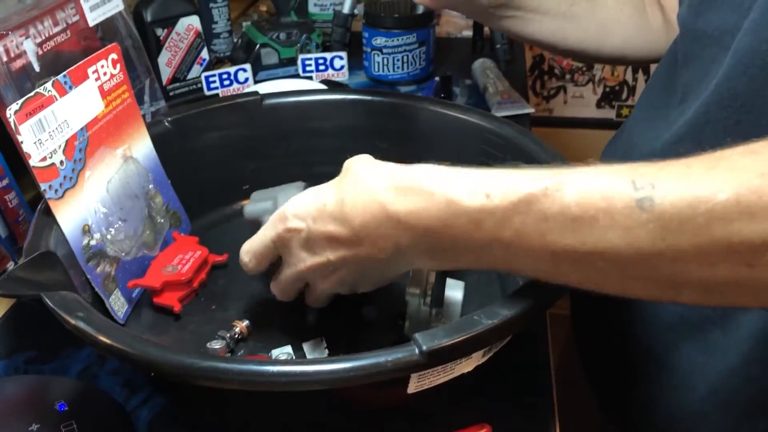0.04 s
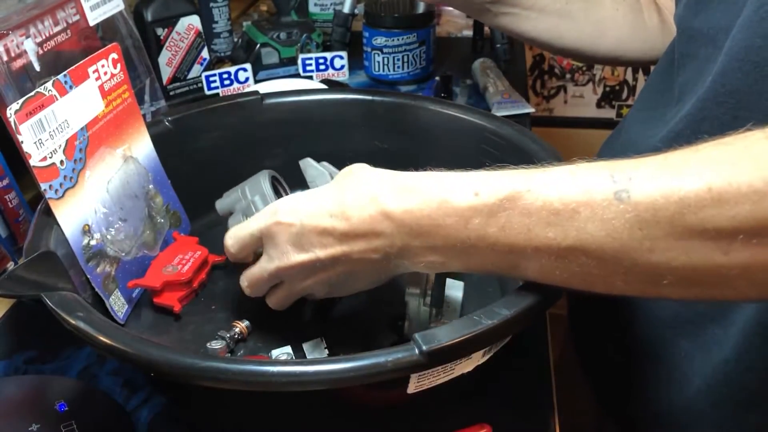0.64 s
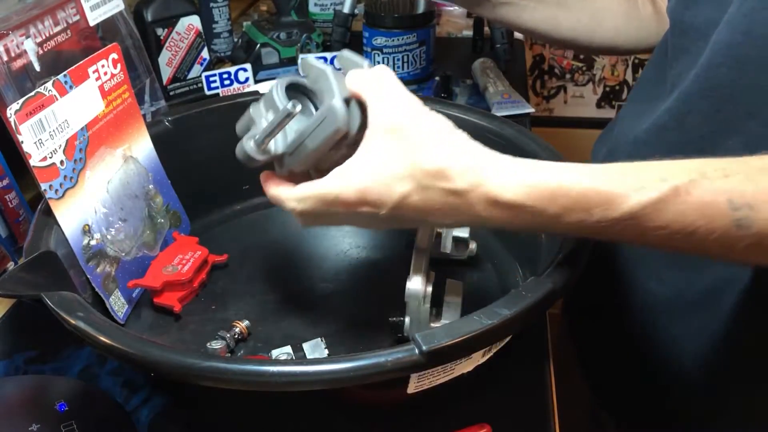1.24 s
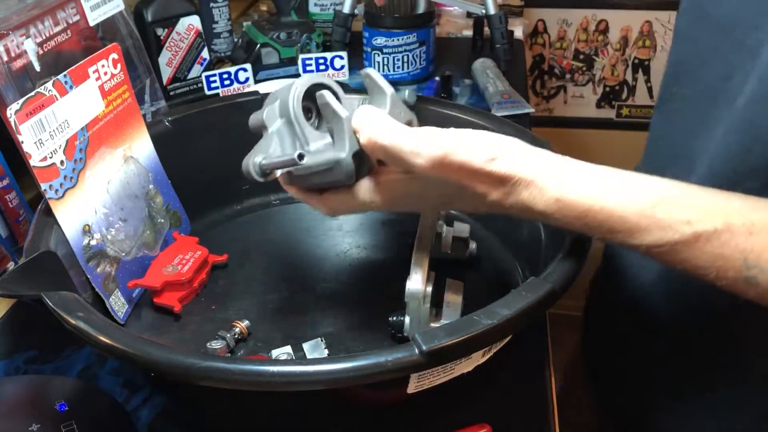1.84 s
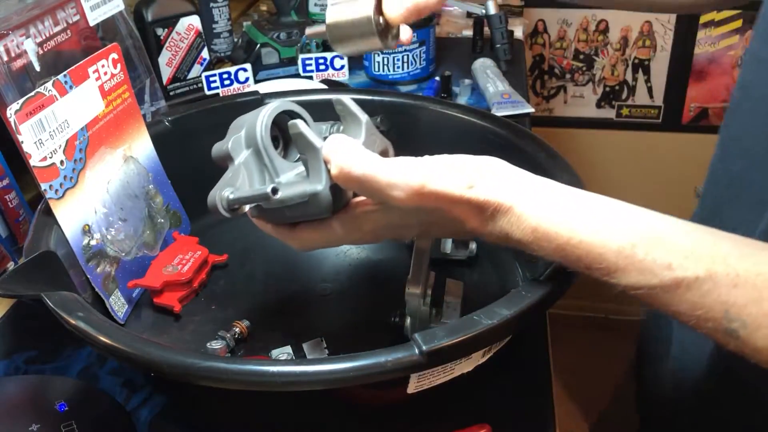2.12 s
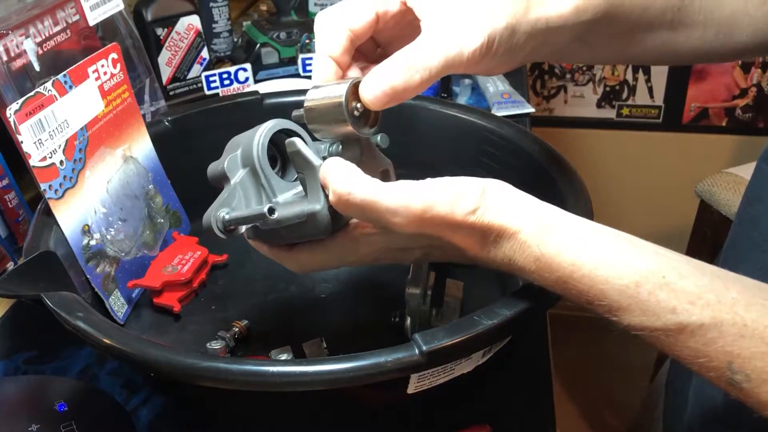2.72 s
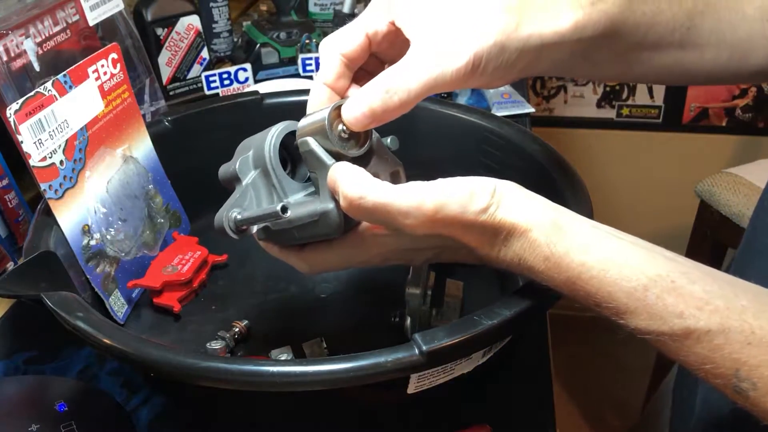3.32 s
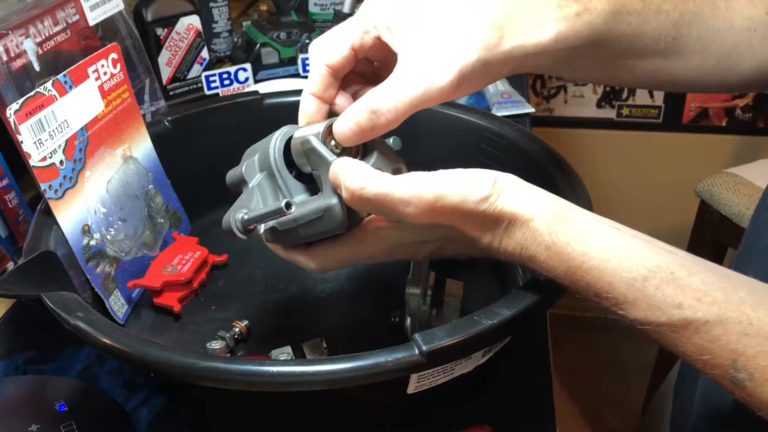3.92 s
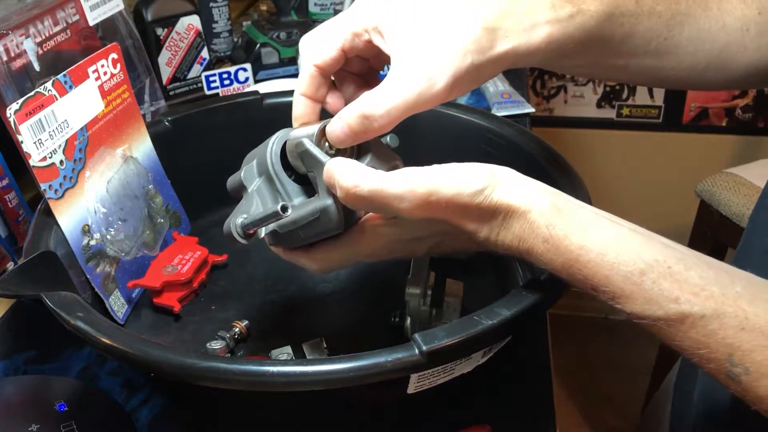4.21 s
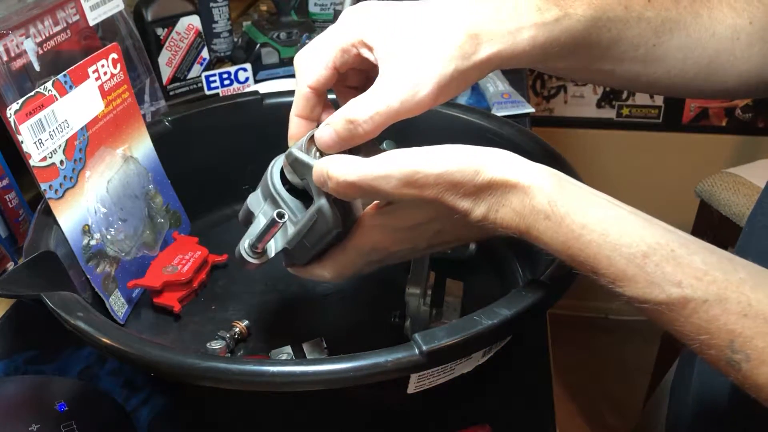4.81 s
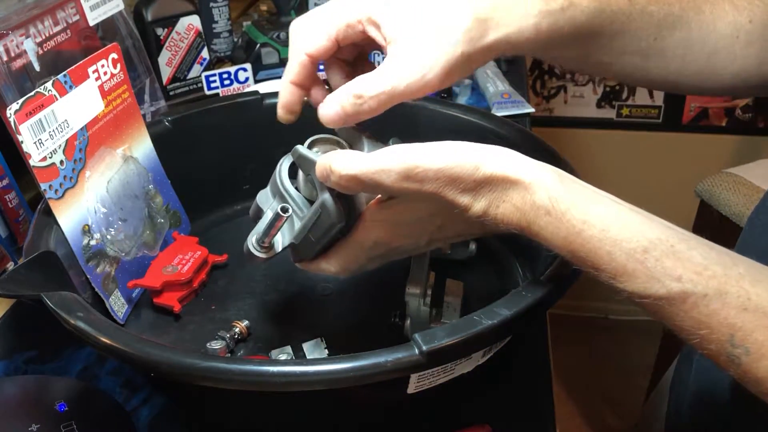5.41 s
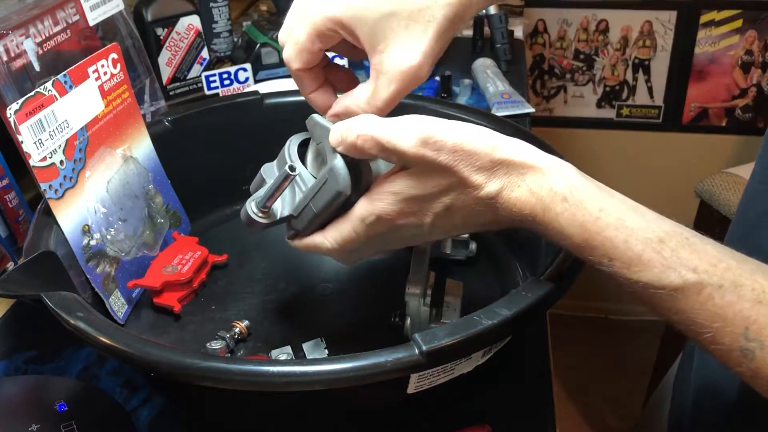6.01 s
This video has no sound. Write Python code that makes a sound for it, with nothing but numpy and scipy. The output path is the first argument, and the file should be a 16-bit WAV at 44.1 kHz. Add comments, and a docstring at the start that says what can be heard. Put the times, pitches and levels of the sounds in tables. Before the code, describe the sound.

A metal brake caliper clicks, knocks and scuffs softly as it is lifted from a plastic tub, and fingers brush the casting. About halfway through, a steel piston taps and clinks against it and briefly scrapes in. Near the end the piston drops home with one bright, rattling, ringing clack, followed by a few light taps. The sounds are close, in a small workshop with a faint electrical hum and fan.

```python
"""Mains hum and a fan fill a small workshop throughout. A brake caliper clicks, knocks and scuffs as it is
lifted out of a plastic tub; fingers brush the casting and light contacts ring on it. From about 2.8 s its
steel piston taps the rim of the bore and scrapes in, exciting the modes of the metal. At 5.2 s the piston
drops home with one bright, rattling clack that sets the whole caliper ringing; a few light taps follow."""
import sys
import numpy as np
from scipy import signal
from scipy.fft import rfft, irfft, next_fast_len
from scipy.io import wavfile
from scipy.ndimage import map_coordinates

SR = 44100
rng = np.random.default_rng(int(sys.argv[2]) if len(sys.argv) > 2 else 0)


def output_pcm(signal):
    """Save a mono or channel-first signal as 16-bit PCM at the path in sys.argv[1].

    Samples are clipped to [-1, 1] before scaling.
    """
    pcm = np.clip(np.atleast_2d(signal).T, -1, 1) * 32767
    wavfile.write(sys.argv[1], SR, np.round(pcm).astype(np.int16))


N = 271215
TIME = np.arange(N) / SR
AGE = np.arange(SR // 2) / SR  # seconds since a blow

# spectrum of a dull blow on the caliper: frequency_hz, density_db
KNOCK_SPECTRUM = [(80, -37), (400, -14), (900, 0.5), (1600, -1.5), (2500, -12), (4000, -15.5), (7000, -22),
                  (15000, -38)]
# spectrum of the bright tick of steel on steel: frequency_hz, density_db
TICK_SPECTRUM = [(500, -26), (2500, -21), (6000, -26), (9000, -2.5), (12000, 20.5), (14500, -0.5),
                 (16000, 3.5)]


def amp(db):
    """Amplitude ratio of a level in decibels."""
    return 10 ** (np.asarray(db) / 20)


def unit(x):
    """Normalisation to an rms of 1."""
    return x / np.sqrt(np.mean(x ** 2) + 1e-20)


def along(points, hz):
    """Interpolation of (frequency_hz, value) points on a logarithmic frequency axis."""
    frequencies, values = np.transpose(points)
    return np.interp(np.log(hz + 1), np.log(frequencies + 1), values)


def fade(t60_s):
    """Damping: a free vibration decays exponentially, by 60 dB in t60_s."""
    return np.exp(-np.log(1000) * AGE / t60_s)


def add(track, start_s, sound):
    """Superposition: a sound adds to the track from start_s on."""
    part = track[max(round(start_s * SR), 0):][:len(sound)]
    part += sound[:len(part)]


def filtered(x, response):
    """Linear filtering: the spectrum is multiplied by a frequency response."""
    size = next_fast_len(len(x) + 8192)
    return irfft(rfft(x, size) * response(np.fft.rfftfreq(size, 1 / SR)), size)[:len(x)]


def noise(spectrum, size):
    """Spectral shaping: white noise is coloured, then scaled to an rms of 1."""
    return unit(filtered(rng.standard_normal(size), lambda hz: amp(along(spectrum, hz))))


def wobble(knots_per_s):
    """Random modulation: a smooth curve through Gaussian values."""
    knots = rng.standard_normal(int(N * knots_per_s / SR) + 4)
    return map_coordinates(knots, [TIME * knots_per_s])


def burst(spectrum, t60_s):
    """Modal overlap: many close modes struck at once merge into decaying noise."""
    return noise(spectrum, len(AGE)) * fade(t60_s)


def mode(hz, t60_s):
    """A normal mode vibrates as a damped sinusoid, here of random phase."""
    return np.sin(2 * np.pi * (hz * AGE + rng.random())) * fade(t60_s)


def resonate(force, modes):
    """Forced vibration: second-order resonances of alternating sign, summed and scaled to an rms of 1."""
    def response(f):
        return sum((-1) ** k * amp(db) * 1j * f * width_hz / (hz * hz - f * f + 1j * f * width_hz)
                   for k, (hz, width_hz, db) in enumerate(modes))
    return unit(filtered(force, response))


def swells(events):
    """Gaussian envelopes: each event rises and falls in a bell curve."""
    return sum(amp(db) * np.exp(-.5 * ((TIME - middle_s) / half_width_s) ** 2)
               for middle_s, db, half_width_s in events)


def hum(waver_db=-0.36, drift_rad=0.089):
    """Periodic vibration of mains and fan gives a line spectrum, slightly unsteady in level and phase."""
    # hum lines: pitch_hz, rms_db
    lines = [(92.8, -60.5), (120, -53), (186, -66), (240, -68), (360, -68.5), (480, -74.5)]
    out = np.zeros(N)
    for hz, db in lines:
        peak = np.sqrt(2) * amp(db + waver_db * wobble(3))
        out += peak * np.sin(2 * np.pi * (hz * TIME + rng.random()) + drift_rad * wobble(1.3))
    return out


def fan(rms_db=-53):
    """Resonance lifts narrow bands of the fan's broadband rush and makes it hollow."""
    # rush of air: frequency_hz, density_db
    air_spectrum = [(20, -43), (38, -21.5), (58, -1), (80, -2), (130, -1.5), (210, -6), (370, -6),
                    (440, -10.5), (650, -9.5), (850, -13.5), (1150, -17), (1650, -17.5), (1950, -22),
                    (2600, -26.5), (3400, -30.5), (4400, -30.5), (7000, -34.5), (15500, -39)]
    # duct resonances: centre_hz, width_hz, boost_db
    duct_modes = [(147.6, 9.7, 8), (181, 9.1, 6.5), (261, 16, 5.5), (1310, 58, 6.5), (1529, 83, 4)]

    def duct_gain(f):
        return amp(sum(db / (1 + (2 * (f - hz) / width_hz) ** 2) for hz, width_hz, db in duct_modes))
    return amp(rms_db) * unit(filtered(noise(air_spectrum, N), duct_gain))


def reverberation(x, delay_s=.006):
    """Wall reflections form a diffuse tail, in which absorption takes the treble first."""
    # reverberation times of the workshop: frequency_hz, t60_s
    decay_times = [(200, 0.4), (2000, 0.33), (5000, 0.33), (9000, 0.26), (15000, 0.16)]
    hz, t, spectra = signal.stft(rng.standard_normal(SR // 2), SR, nperseg=256)
    decay = np.exp(-np.log(1000) * t / along(decay_times, hz)[:, None])
    tail = signal.istft(spectra * decay, SR, nperseg=256)[1]
    tail = np.pad(tail / np.linalg.norm(tail), (round(delay_s * SR), 0))
    return signal.fftconvolve(x, tail)[:N]


def fingers(grain_db=3, nail_t60_s=0.032):
    """Contact noise: two short, broad clicks as the caliper is picked up, finger brushes, nail ticks."""
    # finger brushes and the two clicks: middle_s, level_db, half_width_s
    touches = [(.03, -60, 0.025), (.038, -59, .003), (.058, -50.5, .002), (.73, -70, .05),
               (1.11, -66.5, 0.045), (1.375, -64, 0.057), (1.51, -59.5, 0.023), (1.914, -72, .034),
               (2.15, -70.5, 0.34)]
    # spectrum of the brushes and clicks: frequency_hz, density_db
    touch_spectrum = [(500, 0), (2000, -6), (4500, -3), (8000, -7), (13000, -12), (16000, -6)]
    # fingernail impacts: start_s, level_db
    nail_ticks = [(1.38, -51.5), (2.4412, -55)]
    # nail striking metal: frequency_hz, density_db
    nail_spectrum = [(2000, -18), (6000, -9), (9000, -1), (13000, 2), (16000, -10)]
    out = swells(touches) * unit(noise(touch_spectrum, N) * amp(grain_db * wobble(500)))
    for start_s, db in nail_ticks:
        add(out, start_s, amp(db) * burst(nail_spectrum, nail_t60_s))
    return out


def scuffs(grain_db=3):
    """Sliding friction: the caliper drags on the tub, and the piston in the bore, with a dull noise."""
    # dragging strokes: middle_s, level_db, half_width_s
    strokes = [(.112, -55, 0.05), (1.003, -56, 0.025), (3.55, -62, 0.023)]
    return swells(strokes) * unit(noise(KNOCK_SPECTRUM, N) * amp(grain_db * wobble(200)))


def jaws():
    """Free vibration: the caliper's open jaws ring like a tuning fork."""
    # modes of the jaws: pitch_hz, level_db, t60_s
    modes = [(2251, -0.5, 0.6), (2560, -10.5, 0.29)]
    return sum(amp(db) * mode(hz, t60_s) for hz, db, t60_s in modes)


def knocks(push_hz=1100, push_t60_s=0.0056, thud_t60_s=.06):
    """Impacts damped by the hand: a push of a few cycles, a thud and a faint ring of the jaws."""
    # the caliper against tub and piston: start_s, thud_db, push_db, jaws_db
    blows = [(.036, -44, -50, -85), (.0564, -44, -45, -85), (.119, -46.5, -52, -85), (.979, -53, -38, -90),
             (1.017, -50, -47, -90), (2.7793, -50, -33, -56), (2.9992, -49.5, -48, -54),
             (3.114, -53.5, -48, -80), (5.2453, -31.5, -38, -79)]
    out = np.zeros(N)
    push = np.sin(2 * np.pi * push_hz * AGE) * fade(push_t60_s)
    for start_s, thud_db, push_db, jaws_db in blows:
        thud = burst(KNOCK_SPECTRUM, thud_t60_s)
        add(out, start_s, amp(push_db) * push + amp(thud_db) * thud + amp(jaws_db) * jaws())
    return out


def metal_taps(scatter_db=1.5, tick_db=-12, tick_t60_s=.025, jaws_db=-33, attack_s=.0005):
    """Contact damping: light taps let the steel ring, firm ones shorten the ring. Some taps rebound."""
    # modes of the metal rung by light contacts and taps: pitch_hz, level_db, t60_s
    steel_modes = [(3058, -12.5, 0.36), (5610, -9.5, 0.16), (6810, -32, 0.24), (7100, -16, 0.16),
                   (8320, -23, .22), (9525, -19, .15), (10650, -15, .08), (11680, -7, 0.27),
                   (12100, -4, 0.086), (12150, -24, 0.054), (12600, -17, .06), (13520, -18, .06),
                   (14130, -16, 0.14), (14350, -5, .04)]
    # light ringing contacts on the caliper, then the piston tapping the bore:
    # start_s, level_db, tilt_db_per_octave, contact_count
    taps = [(0.09, -60, 5, 1), (.515, -68, 2, 1), (1.9, -66, 0, 1), (2.778, -57, 12, 1),
            (2.826, -57.5, 8, 1), (3.0014, -53, -6, 1), (3.113, -40.5, 3, 4), (3.178, -60, 5, 1),
            (3.196, -60, 7, 2), (3.257, -69, 9, 1), (3.268, -49.5, 7, 2), (3.435, -53, 6, 1),
            (3.517, -49, 12, 1), (3.614, -52, 3, 1), (3.798, -65, -4.5, 1), (4.784, -66, -1, 1),
            (4.9387, -57.5, 0.5, 2), (5.188, -52, 1, 3), (5.675, -57.5, 4, 1), (5.81, -64, 4, 1),
            (5.855, -70, 2, 1)]
    bounce_s, bounce_loss_db = 0.01, 5
    free_ring_db, halving_db = -62.5, 14  # ring time halves for each halving_db above free_ring_db
    onset = 1 - np.exp(-AGE / attack_s)
    out = np.zeros(N)
    for start_s, first_db, tilt, contact_count in taps:
        damping = 2 ** ((first_db - free_ring_db) / halving_db)
        for k in range(round(contact_count)):
            ring = np.zeros(len(AGE))
            for hz, db, t60_s in steel_modes:
                mode_db = db + tilt * np.log2(hz / 10000) + scatter_db * rng.standard_normal()
                ring += amp(mode_db) * mode(hz, t60_s / damping)
            contact = ring + amp(jaws_db) * jaws() + amp(tick_db) * burst(TICK_SPECTRUM, tick_t60_s)
            add(out, start_s + k * bounce_s, amp(first_db - k * bounce_loss_db) * contact * onset)
    return out


def steel_scrape(slips_per_s=6000, chatter_db=3, ring_db=-4, rasp_db=-2):
    """Stick-slip friction: dense tiny slips of steel on steel drive the resonances of the metal."""
    # sliding strokes: middle_s, level_db, half_width_s
    strokes = [(0.125, -59.5, 0.025), (.515, -71, 0.021), (3.535, -49, .043), (3.768, -67.5, .028),
               (5.21, -60, .016)]
    # resonances ringing freely: centre_hz, width_hz, level_db
    free_modes = [(2270, 14, -3), (2574, 12, -7), (3060, 17, -3.5), (5610, 51, -1.5), (6716, 15.85, 2),
                  (7230, 20, -1.5), (8360, 16, 1.5)]
    # resonances pinched at the contact: centre_hz, width_hz, level_db
    pinched_modes = [(10660, 350, -11.5), (11660, 140, -0.5), (12150, 370, -5), (12580, 600, -15.5),
                     (14130, 195.5, -6)]
    speed = swells(strokes)
    slipping = rng.random(N) < slips_per_s / SR
    slips = unit(slipping * rng.standard_normal(N) * amp(chatter_db * wobble(120)))
    force = speed * slips
    ring = np.std(force) * resonate(force, free_modes)
    # a firm stroke starts cocked; the pinched resonances sink as the piston straightens
    pitch_rise, lead_half_widths = .05, 2.3
    firmest_db = max(db for _, db, _ in strokes)
    cocked = swells([(middle_s - lead_half_widths * half_width_s, db - firmest_db, half_width_s)
                     for middle_s, db, half_width_s in strokes])
    read_position = np.cumsum(1 + pitch_rise * cocked)
    rasp = map_coordinates(resonate(slips, pinched_modes), [read_position], order=5)
    return amp(ring_db) * ring + amp(rasp_db) * speed * rasp


def piston_clack(ring_db=0.8, tick_db=-16, tick_t60_s=0.023):
    """Impact excitation: the piston hits its seat, chatters briefly and sets the whole caliper ringing."""
    # impacts on the seat: start_s, level_db, t60_s
    impacts = [(5.232, -16, 0.033), (5.2329, -14, 0.014), (5.2363, -19, 0.034), (5.2406, -18.5, 0.041),
               (5.247, -26, .09)]
    # dense, short-lived modes of the casting: frequency_hz, density_db
    casting_spectrum = [(100, -45), (400, -17), (700, -18), (1000, -3), (1300, -15.5), (1650, 7.5),
                        (2300, -6), (3300, 0.5), (4200, 2), (5000, -5), (7000, 0), (9000, -2.5),
                        (10500, -6), (11800, 2.5), (13500, -6), (15500, -8.5)]
    # modes of caliper and piston together: pitch_hz, level_db, t60_s, rise_s
    coupled_modes = [(935, -37, .14, .006), (1548, -20.5, .09, .003), (1655, -26.5, .09, .003),
                     (1750, -29, .12, .003), (2257, -36.5, .22, .002), (2548, -35, .24, .012),
                     (2574, -39, .25, .003), (2985, -37, .22, .002), (3470, -24, .06, .001),
                     (3974, -25, .1, .001), (4474, -33.5, .13, .001), (5699, -31, .13, .001),
                     (6667, -30.5, .17, .002), (6779, -27, .09, .002), (7228, -27, .12, .008),
                     (8317, -26.5, .19, .003), (9528, -6.5, .1, .022), (10540, -32, .08, .001),
                     (11483, -16, .055, .001), (11593, -15, .05, .001), (11783, -12, .05, .001),
                     (12590, -33, .14, .001), (13540, -28, .1, .001), (14030, -32, .08, .001)]
    out = np.zeros(N)
    for start_s, db, t60_s in impacts:
        add(out, start_s, amp(db) * burst(casting_spectrum, t60_s))
    ring = sum(amp(db) * mode(hz, t60_s) * (1 - np.exp(-AGE / rise_s))
               for hz, db, t60_s, rise_s in coupled_modes)
    tick = burst(TICK_SPECTRUM, tick_t60_s)
    first_impact_s = impacts[0][0]
    add(out, first_impact_s, amp(ring_db) * ring + amp(tick_db) * tick)
    return out


def scene(reverberation_db=-12):
    """Superposition in one channel: direct sound of the parts, their reverberation, hum and fan."""
    direct = metal_taps() + steel_scrape() + piston_clack() + knocks() + fingers() + scuffs()
    return (direct + amp(reverberation_db) * reverberation(direct) + hum() + fan())[None]


def record(dry):
    """Band limiting: an ideal low-pass filter removes the highest treble."""
    cutoff_hz = 15850
    return np.array([filtered(channel, lambda hz: hz < cutoff_hz) for channel in dry])


dry = scene()
out = record(dry)
output_pcm(out)
```